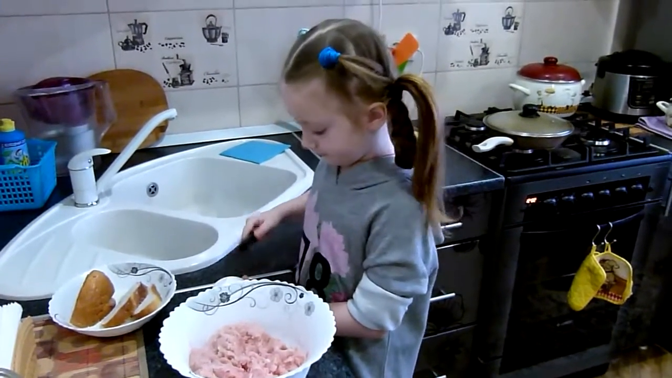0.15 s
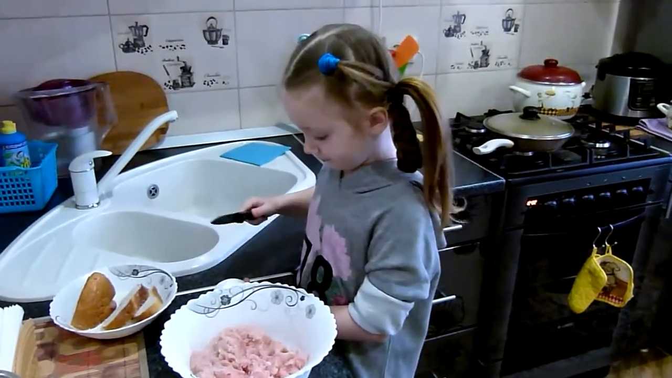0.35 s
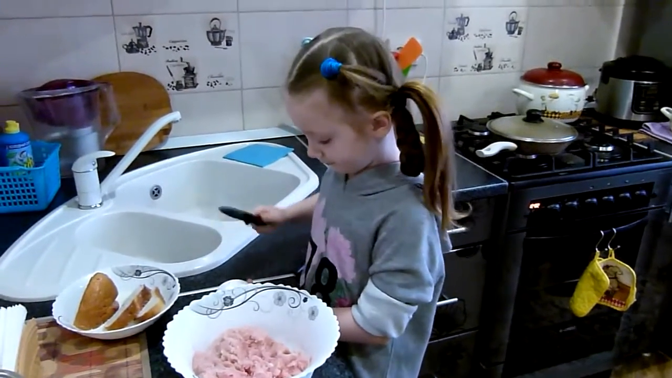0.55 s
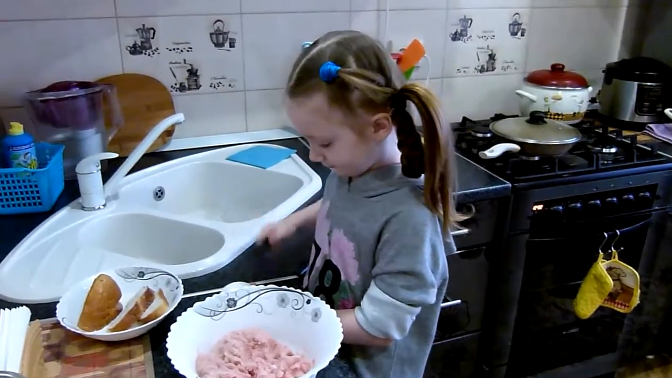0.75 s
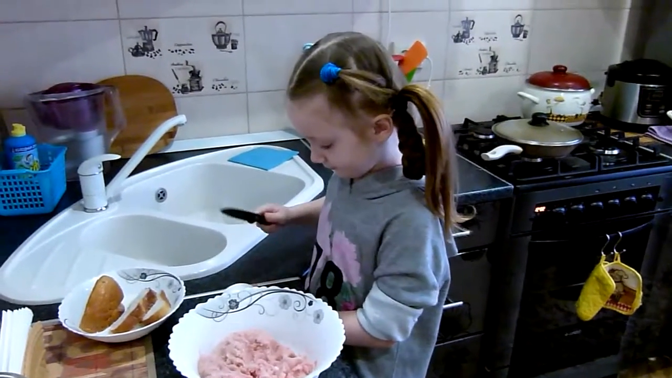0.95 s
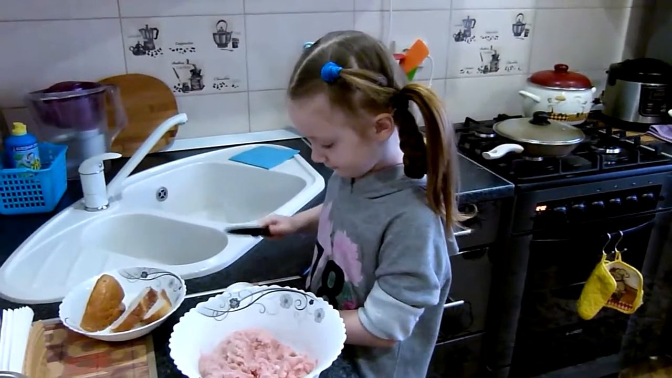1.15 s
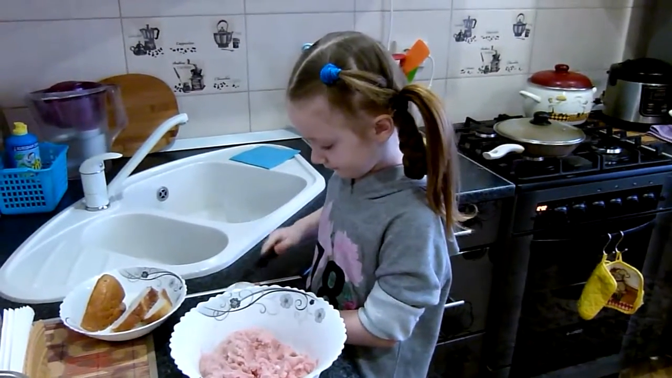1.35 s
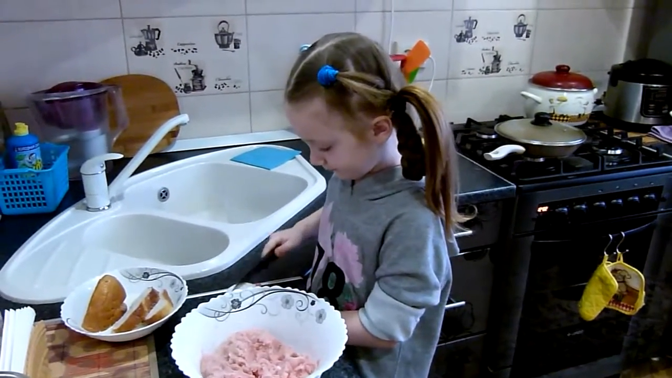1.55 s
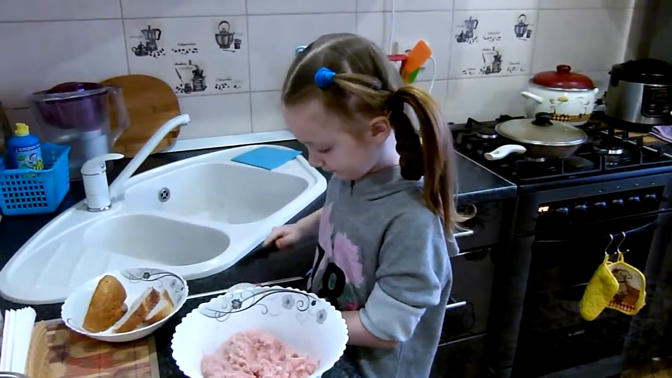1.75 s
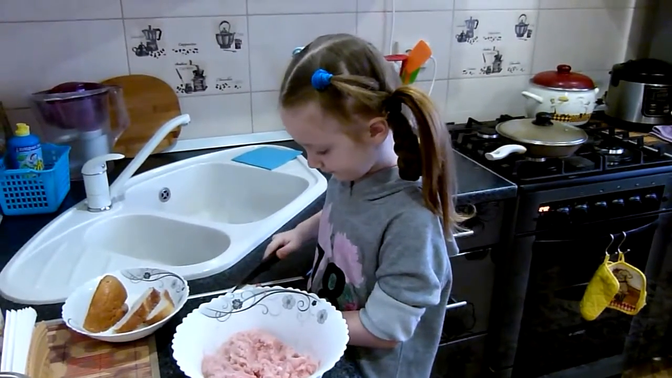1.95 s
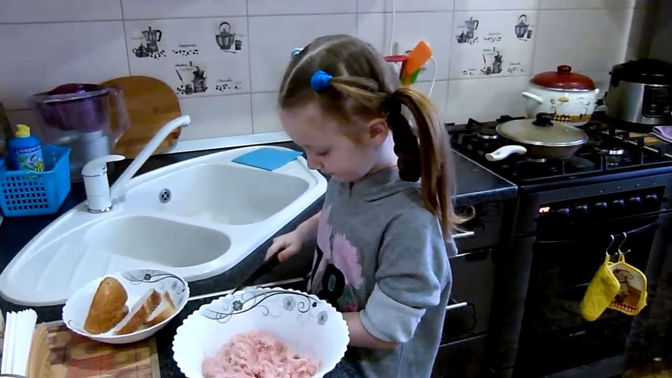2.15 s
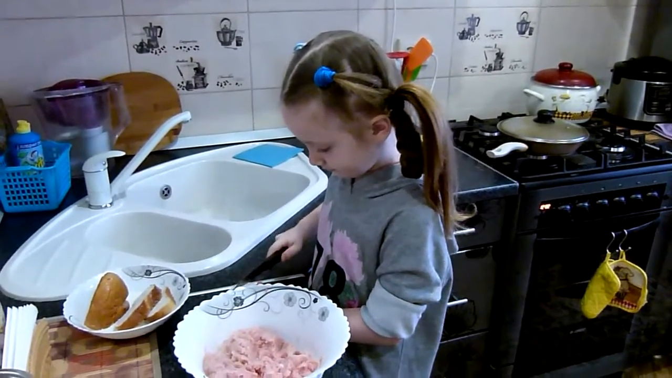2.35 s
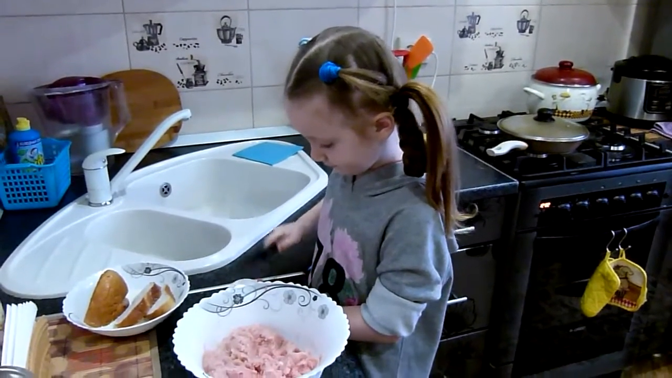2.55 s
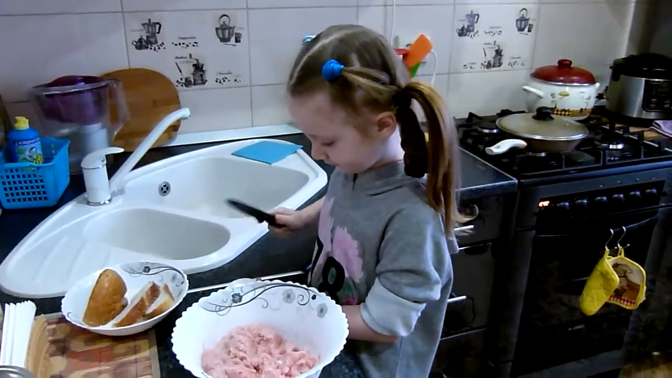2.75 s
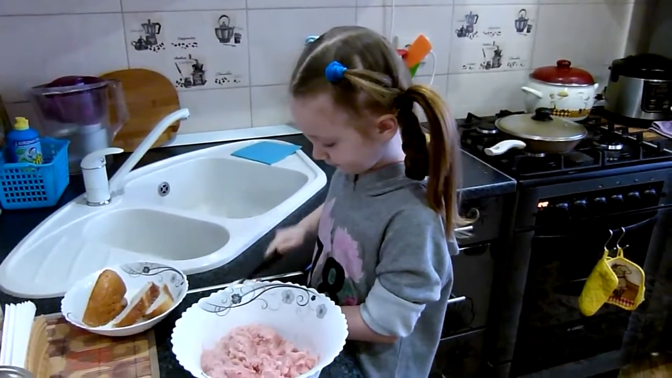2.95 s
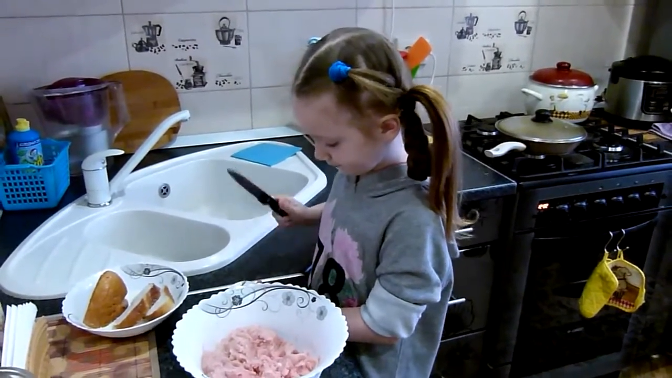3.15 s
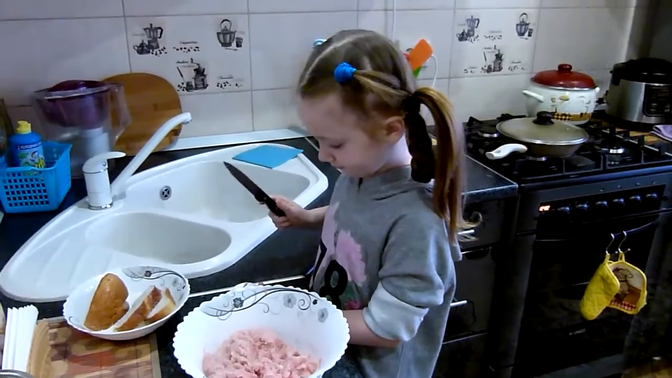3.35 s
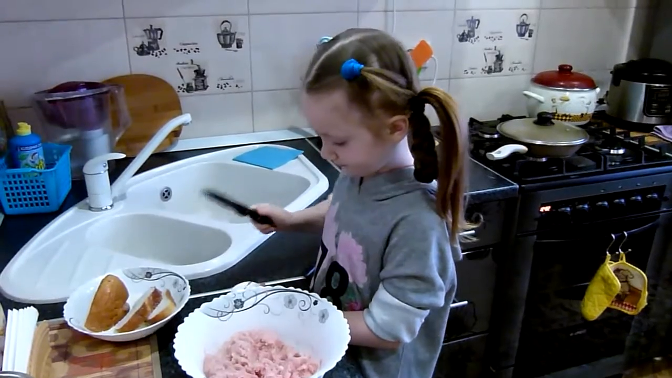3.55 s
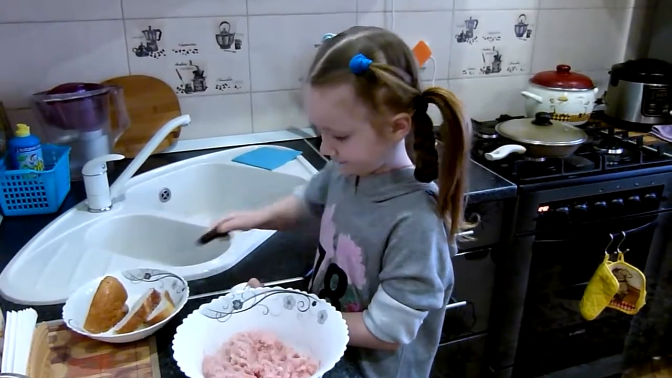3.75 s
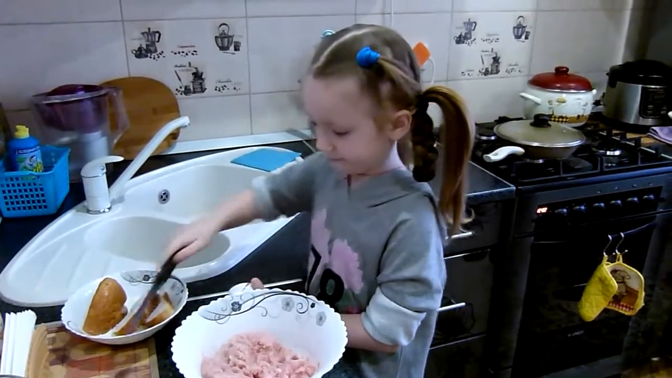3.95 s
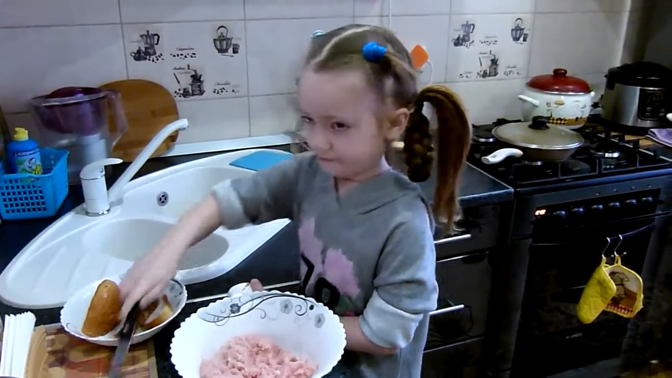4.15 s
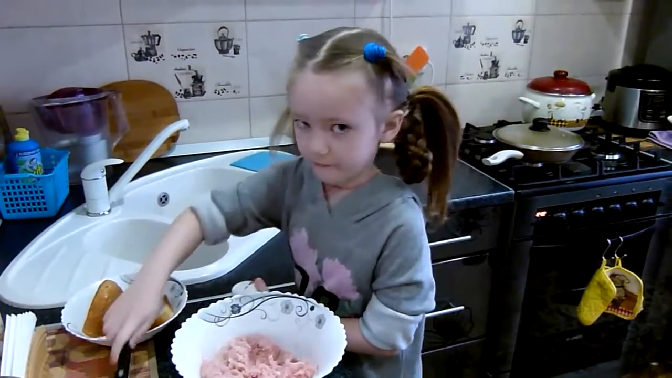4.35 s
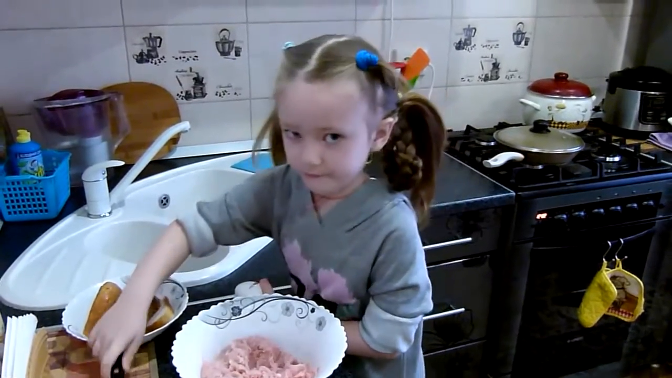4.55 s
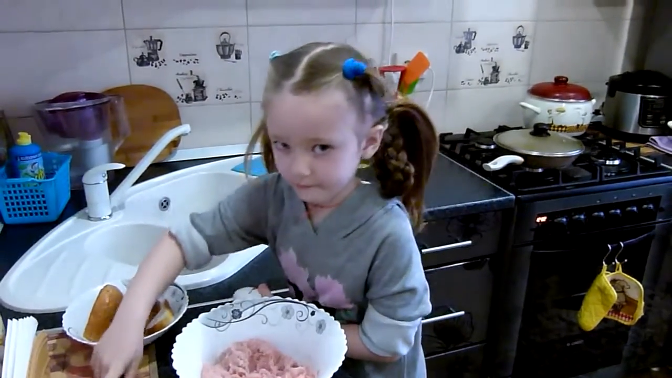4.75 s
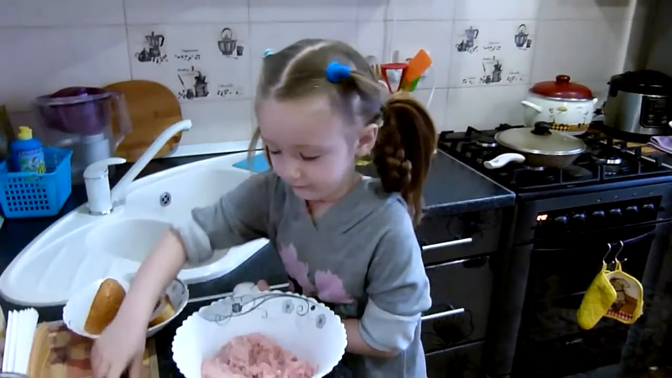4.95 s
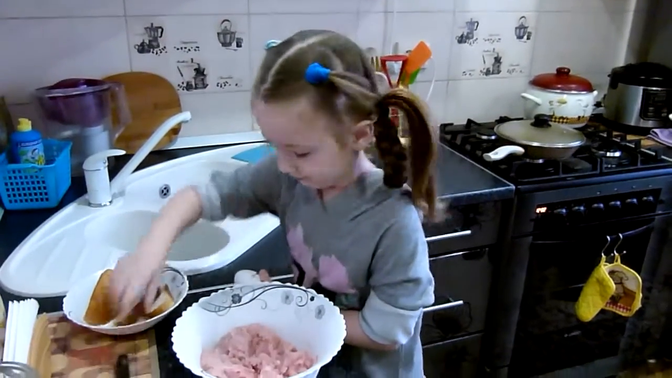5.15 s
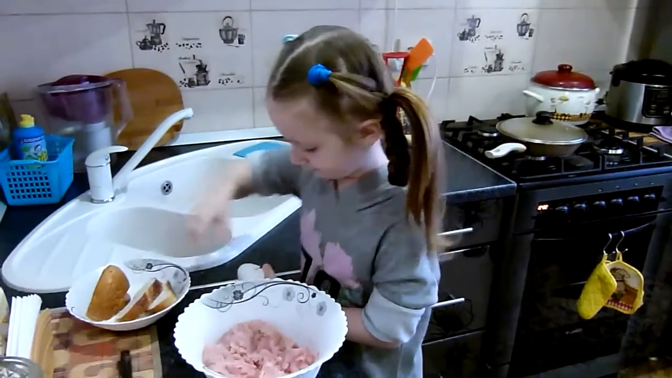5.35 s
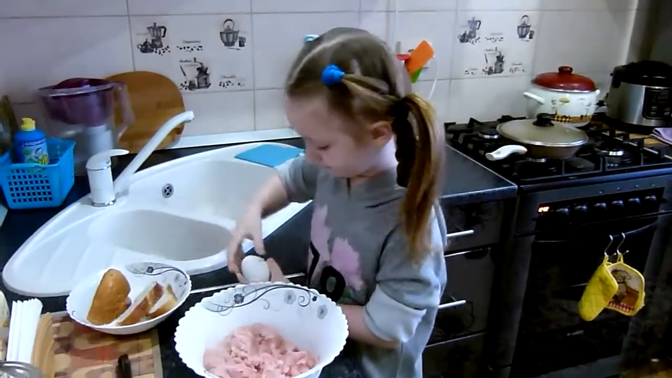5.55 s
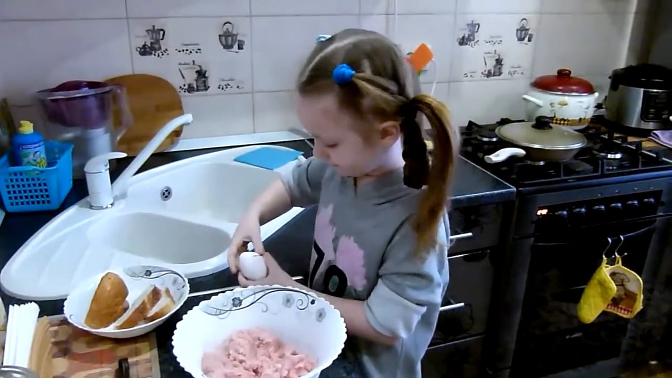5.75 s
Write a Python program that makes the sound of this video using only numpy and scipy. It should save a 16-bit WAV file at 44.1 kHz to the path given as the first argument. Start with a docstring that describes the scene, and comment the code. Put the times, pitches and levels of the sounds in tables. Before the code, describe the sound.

A knife knocks on an egg in short, irregular clacks, once hard, then is set down on a board with a brief ring.

```python
"""In a small tiled kitchen, a knife knocks five times on an egg held beside a ceramic bowl, lightly
touches the bowl, then strikes the egg once hard. The hand damps the blade, so each knock is a short clack.
The knife is then laid on a board: it touches, slides, drops and rings briefly, and the fingers slip off.
Behind it are a quiet hiss, a brushing sleeve and a few soft plops of bubbles in water.
Counter, tiles and cupboards add a short echo."""
import sys
import numpy as np
from scipy import signal
from scipy.fft import rfft, irfft
from scipy.io import wavfile

SR = 44100
rng = np.random.default_rng(int(sys.argv[2]) if len(sys.argv) > 2 else 0)


def dump(signal):
    """Clip the signal to [-1, 1] and save it as 16-bit WAV at the path in sys.argv[1]."""
    limited = np.clip(np.atleast_2d(signal).T, -1, 1)
    pcm = np.round(limited * 32767).astype(np.int16)
    wavfile.write(sys.argv[1], SR, pcm)


N = 255603


def amp(db):
    """Turns decibels into a number to multiply by."""
    return 10 ** (np.asarray(db) / 20)


def unit_level(x):
    """Scales a signal so that its average power is 1."""
    return x / np.sqrt(np.mean(x ** 2) + 1e-20)


def curve(points, hz):
    """Reads between the (frequency, value) points of a table, with octaves evenly spaced."""
    f, value = np.transpose(points)
    return np.interp(np.log(hz + 1), np.log(f + 1), value)


def bump(hz, centre, width):
    """A bell-shaped curve of height 1."""
    return np.exp(-.5 * ((hz - centre) / width) ** 2)


def add(mix, start_s, sound):
    """Adds a stereo sound to the mix."""
    part = mix[:, round(start_s * SR):][:, :sound.shape[1]]
    part += sound[:, :part.shape[1]]


def bins(size):
    """The frequencies in the spectrum of this many samples."""
    return np.fft.rfftfreq(size, 1 / SR)


def click(db):
    """A sudden pulse with these levels from bass to treble; it also serves as a filter."""
    log_gain = np.log(amp(np.r_[db, db[-2:0:-1]]))
    return np.fft.ifft(np.exp(np.conj(signal.hilbert(log_gain)))).real


def noise_pair(likeness, size):
    """Spectra of a left and a right white noise: likeness 1 is the same, 0 unrelated, -1 opposite."""
    a, b = rfft(rng.standard_normal((2, size)))
    return np.array([a, likeness * a + np.sqrt(1 - likeness ** 2) * b])


# The first echoes. Each row: delay in milliseconds, strength on the left, strength on the right.
ECHOES = [(0, .46, .42), (1.1, .32, .16), (2.1, .33, .19), (5.2, .29, .42), (8.9, .17, .15),
          (14.2, .12, .15), (18.1, .12, .16), (23, .11, .17), (28.4, .18, .13)]
# Their lean to the left. Each row: frequency in Hz, dB added on the left and taken from the right.
LEFT_LIFT = [(300, -3), (1100, -1), (2700, 4), (4800, 4), (7000, 3)]
# Tone of the echo's tail. Each row: frequency in Hz, level in dB.
TAIL_TONE = [(40, -19.5), (120, -12.5), (300, 5.5), (550, -2.5), (1100, -2), (2000, 1), (10000, 0)]
# How long the tail lasts. Each row: frequency in Hz, seconds to fade by 60 dB.
TAIL_FADE = [(100, 0.21), (500, 0.42), (1500, 0.43), (3500, 0.39), (6000, 0.33), (10000, 0.31)]

def kitchen(x, near_db, tail_db, build_s=0.0031, mic_gap_m=0.074):
    """Sound arrives directly, bounces off counter, tiles and cupboards, then blurs into a fading tail."""
    size = SR // 2
    t, early = np.arange(size) / SR, np.zeros((2, size))
    lift_db = curve(LEFT_LIFT, bins(256))
    sides = np.array([click(lift_db), click(-lift_db)])
    for ms, left, right in ECHOES:
        add(early, ms / 1000, sides * [[left], [right]])
    likeness = np.sinc(2 * bins(size) * mic_gap_m / 343)  # both sides share the bass
    wash = irfft(noise_pair(likeness, size), size)
    hz, age, spectra = signal.stft(wash, SR, nperseg=256)
    spectra *= amp(curve(TAIL_TONE, hz)[:, None] - 60 * age / curve(TAIL_FADE, hz)[:, None])
    tail = signal.istft(spectra, SR, nperseg=256)[1][:, :size]
    tail = unit_level(tail * (1 - np.exp(-t / build_s))) / np.sqrt(size)
    return signal.fftconvolve(x[None], amp(near_db) * early + amp(tail_db) * tail, axes=1)


# Tone of the hiss. Each row: frequency in Hz, level in dB.
HISS_TONE = [(18, -60.5), (30, -33.5), (81, -34), (199, -10), (280, -8), (308, -6.5), (403, -7.5),
             (433, -9.5), (513, -3.5), (919, -6), (1200, -6.5), (1290, -7.5), (2870, -12.5), (5400, -12.5),
             (9910, -42), (12900, -78), (21800, -120)]
# How alike its left and right are. Each row: frequency in Hz, likeness from -1 to 1.
HISS_LIKENESS = [(60, 0.048), (120, 0.67), (250, 0.86), (520, 0.47), (1080, -0.3), (2230, -0.59),
                 (4590, -0.52), (9460, 0.68)]

def hiss(level_db=-59, waver_db=0.04):
    """The steady air of the kitchen, wavering very slightly."""
    hz, t = bins(N), np.arange(N) / SR
    spectra = noise_pair(curve(HISS_LIKENESS, hz), N) * amp(curve(HISS_TONE, hz))
    air = unit_level(irfft(spectra, N))
    waver = sum(np.sin(2 * np.pi * (f * t + rng.random())) / np.sqrt(f) for f in np.geomspace(.7, 12, 20))
    return air * amp(level_db - waver_db * unit_level(waver))


# Plops of water. Each row: start in seconds, level in dB, starting pitch in Hz.
BUBBLES = [(0.060, -46.5, 827), (0.511, -50.5, 910), (0.674, -48.5, 884), (1.362, -50, 960),
           (2.565, -53, 906), (2.893, -45.5, 832), (3.693, -49, 926), (3.745, -49.5, 787),
           (4.198, -51, 1338), (5.561, -46.5, 829)]

def plops(glide=1.946, swell_s=0.00541):
    """Each small bubble rings with a soft, short tone that rises a little."""
    out, t = np.zeros((2, N)), np.arange(SR // 16) / SR
    swell = t / swell_s * np.exp(1 - t / swell_s)
    for start, db, hz in BUBBLES:
        tone = swell * np.sin(2 * np.pi * hz * t * (1 + glide * t))
        add(out, start, amp(db) * kitchen(tone, near_db=-4, tail_db=-13.5))
    return out


def rub(strokes, tone, grain_db, attack_s, sag_db_per_s, release_s, slips_per_s=3000):
    """Rubbing is many tiny, uneven slips; each stroke takes hold, weakens as it slows, and lets go."""
    t, gain = np.arange(N) / SR, np.zeros(N)
    for start, length, db in strokes:
        age = np.maximum(t - start, 0)
        take_hold = np.minimum(age / attack_s, 1)
        let_go = np.exp(-np.maximum(age - length, 0) / release_s)
        gain += take_hold * amp(db - sag_db_per_s * age) * let_go
    slips = rng.standard_normal(N) * (rng.random(N) < slips_per_s / SR)
    slips *= amp(grain_db * np.minimum(rng.exponential(1, N), 4))  # a few slips stand out
    friction = signal.oaconvolve(slips, click(curve(tone, bins(2048))))[:N]
    return kitchen(unit_level(friction) * gain, near_db=-0.5, tail_db=-3.5)[:, :N]


# Brushes of the sleeve. Each row: start in seconds, length in seconds, level in dB.
SLEEVE_STROKES = [(4.0, 0.095, -57), (4.14, 0.11, -58.5), (5.05, 0.063, -69)]
# The dull tone of cloth. Each row: frequency in Hz, level in dB.
CLOTH_TONE = [(60, -45), (180, -7), (300, 9.5), (600, 5), (1300, -28), (3000, -25), (9000, -43)]

def sleeve():
    """The sleeve brushes along as the arm reaches out and draws back."""
    return rub(SLEEVE_STROKES, CLOTH_TONE, grain_db=7, attack_s=0.012, sag_db_per_s=41, release_s=0.025)


# Pushes over the board. Each row: start in seconds, length in seconds, level in dB.
SLIDE_STROKES = [(4.412, 0.13, -50), (4.77, 0.28, -62.5), (4.94, 0.12, -64)]
# The bright tone of scraping. Each row: frequency in Hz, level in dB.
SCRAPE_TONE = [(30, -46), (130, -21), (400, 6), (900, -3), (2200, -8), (4500, 8), (6000, 6.5), (7500, -3.5),
               (10000, -20)]

def slides():
    """Steel and fingers slide over the board in short pushes."""
    return rub(SLIDE_STROKES, SCRAPE_TONE, grain_db=3.5, attack_s=0.008, sag_db_per_s=34, release_s=0.02)


def crunch(decay_s, size=1024):
    """An edge bites into a hard surface: one push, then a tiny swell of treble."""
    age = np.arange(size) / SR / decay_s
    burst = np.diff(rng.standard_normal(size + 1)) * (.3 + age) * np.exp(-age)
    burst[0] += 1  # the push
    for _ in range(3):  # keep it short and make all frequencies equally strong
        spectrum = rfft(burst * np.exp(-age / 10))
        burst = irfft(spectrum / (abs(spectrum) + 1e-12))
    return burst


def ring(notes, bass_cut_hz=400):
    """A struck object rings with several fading notes; neighbours swing in opposite directions."""
    t = np.arange(SR // 2) / SR
    swing = sum((-1) ** k * amp(db - 60 * t / fade_s) * np.sin(2 * np.pi * hz * t)
                for k, (hz, db, fade_s) in enumerate(notes))
    return signal.sosfilt(signal.butter(2, bass_cut_hz, "highpass", fs=SR, output="sos"), swing)


# The knife meets the board. Each row: start in seconds, click in dB, ring in dB, bass boost in dB.
BOARD_TOUCHES = [(4.4069, 4.5, -73, -7.5), (4.440, -3, -68, 4), (4.490, -14, -47.5, 14),
                 (4.5502, 11.5, -21.5, -9.5), (4.5576, 5, -44, -4.5), (4.9353, -8, -68, -6),
                 (5.033, -9, -78, -10), (5.0648, -3.5, -71, 9.5), (5.0921, -6, -76, 13.5)]
# Tone of the click. Each row: frequency in Hz, level in dB.
TOUCH_TONE = [(40, -26.5), (160, -10), (400, -4), (720, 4), (1300, -2), (2300, -7.5), (3500, -8.5),
              (4700, -1.5), (6500, -7), (8700, -23), (10000, -52)]
# The notes of the free blade as it bends to and fro. Each entry: pitch in Hz.
BLADE_PITCHES = [500, 781, 1125, 1238, 1981, 2965, 3008, 4188, 5535, 7066, 8931]
# How each of those notes rings. Each row: level in dB, seconds to fade by 60 dB.
BLADE_RING = [(-9, 0.24), (-13.5, 0.19), (-7, 0.13), (2, 0.073), (-1, 0.088), (-25, 0.03), (5, 0.1),
              (5, 0.12), (3.5, 0.085), (-3.5, 0.039), (-16.5, 0.052)]

def touches(thump_hz=100, thump_width_hz=216):
    """The loose knife clicks and thumps on the board, and its blade rings when it drops free."""
    out, hz = np.zeros((2, N)), bins(4096)
    blade = ring([(pitch, *note) for pitch, note in zip(BLADE_PITCHES, BLADE_RING)])
    for start, click_db, ring_db, thump_db in BOARD_TOUCHES:
        pulse = click(curve(TOUCH_TONE, hz) + thump_db * bump(hz, thump_hz, thump_width_hz))
        body = amp(ring_db) * blade
        body[:len(pulse)] += amp(click_db) * pulse
        touch = np.convolve(body, crunch(decay_s=0.0012))
        add(out, start, kitchen(touch, near_db=-9, tail_db=-8.5))
    return out


# Knocks of the knife. Each row: start in seconds, level in dB, hardness from 0 to 1, thud boost in dB,
# thud pitch in Hz, then a boost in dB for each of the four CLACK_BANDS.
KNIFE_KNOCKS = [(0.1771, 11, 0.31, 2.8, 820, -1, -5.5, 0.5, 1.5),
                (0.7790, 19.5, 0.15, 8.2, 450, 0.5, 8, 2, 1), (1.3947, 20.5, 0, 1.4, 676, 1, 2.5, 5, 2.5),
                (1.6704, 17, 0.073, 3.7, 730, -1.5, -2, 2.5, 1),
                (1.9512, 20, 0.0017, 0.57, 790, -3, 1, 0.5, 6.5),
                (2.632, -9.5, 0, 16.6, 661, -2.5, 5, -8, 3.5),
                (3.037, 34, 0.67, 1.03, 677, -3, 3.5, -0.5, 1)]
# Where the gripped blade sounds most readily. Each row: centre in Hz, width in Hz.
CLACK_BANDS = [(2650, 550), (3700, 400), (4950, 470), (6350, 310)]
# Tones of a light and of a hard knock. Each row: frequency in Hz, level in dB.
LIGHT_TONE = [(30, -41.5), (150, -31), (370, -27.5), (550, 3), (900, 0), (1100, 3), (2000, 0.5), (2750, 4),
              (3600, -9.5), (4900, 3.5), (5800, -2), (6800, -4), (8700, -16.5), (10000, -32.5)]
HARD_TONE = [(30, -20.5), (90, -25), (180, -6), (380, -4), (640, 8.5), (1050, -0.5), (1800, -10),
             (2600, -3), (3500, -3), (4200, -9), (5700, 2.5), (7300, -5), (8700, -15.5), (10000, -32.5)]
# Brief ring of the gripped knife and nearby bowl, and of the counter below.
# Each row: pitch in Hz, level in dB, seconds to fade by 60 dB.
KNOCK_NOTES = [(562.7, -48, 0.17), (610, -54, 0.24), (786, -53, .12), (900, -54.5, 0.17),
               (1218, -53.5, 0.17), (1370, -56, 0.29), (1626, -57.5, 0.2086), (2030, -55.5, .1),
               (2670, -45.5, .02), (2869, -43.5, 0.077), (4400, -44, 0.047), (4515, -37.5, 0.038),
               (4920, -47.5, 0.13), (4980, -50, 0.24), (5010, -52, 0.17), (6210, -44, 0.091)]
COUNTER_NOTES = [(358.7, -56.5, 0.25), (617, -50, 0.3), (748, -50.5, 0.17), (934, -52, 0.2),
                 (1090, -53.5, 0.2)]

def knocks(bite_s=0.00075, thud_width_hz=110):
    """The hand damps the blade, so each knock is a short clack; a hard one is deeper, shaking the counter."""
    out, hz = np.zeros((2, N)), bins(4096)
    for start, db, hardness, thud_db, thud_hz, *boosts_db in KNIFE_KNOCKS:
        pulse = click((1 - hardness) * curve(LIGHT_TONE, hz) + hardness * curve(HARD_TONE, hz))
        body = ring(KNOCK_NOTES) * (1 - .5 * hardness) + hardness * ring(COUNTER_NOTES)
        body[:len(pulse)] += pulse
        # the spot where the knife lands brings out some bands more than others
        spot_db = sum(boost * bump(hz, *band) for boost, band in zip(boosts_db, CLACK_BANDS))
        spot_db += thud_db * bump(hz, thud_hz, thud_width_hz)
        blow = np.convolve(click(spot_db), crunch(bite_s))
        knock = signal.fftconvolve(body, blow)
        add(out, start, amp(db) * kitchen(knock, near_db=-9, tail_db=-8))
    return out


def scene():
    """All the sounds together, in stereo."""
    return knocks() + touches() + slides() + sleeve() + plops() + hiss()


def gain_control(x, threshold_db=-17.5, strength=0.73, recovery_db_per_s=62):
    """Turns the volume down within milliseconds of a loud peak, then steadily back up."""
    power = signal.lfilter([.01], [1, -.99], (x ** 2).mean(0))
    power_db = 10 * np.log10(power + 1e-12)
    fall_db = np.arange(N) * recovery_db_per_s / SR
    peak_db = np.maximum.accumulate(power_db + fall_db) - fall_db  # jumps up, sinks slowly
    excess_db = np.maximum(peak_db - threshold_db, 0)
    smooth_excess_db = signal.lfilter([.008], [1, -.992], excess_db)
    return x / amp(strength * smooth_excess_db)


def record(dry, notch_hz=8030, notch_width_hz=210, notch_db=-22, ceiling=0.77, top_hz=9980):
    """The microphone loses a narrow band of treble, tames loud peaks and cuts the highest frequencies."""
    notch = click(notch_db * bump(bins(2048), notch_hz, notch_width_hz))
    heard = gain_control(signal.oaconvolve(dry, notch[None], axes=1)[:, :N])
    rounded = heard / (1 + (heard / ceiling) ** 6) ** (1 / 6)
    treble_cut = signal.firwin(301, top_hz, window=("kaiser", 8), fs=SR)
    return signal.oaconvolve(rounded, treble_cut[None], "same")


dry = scene()
out = record(dry)
dump(out)
```